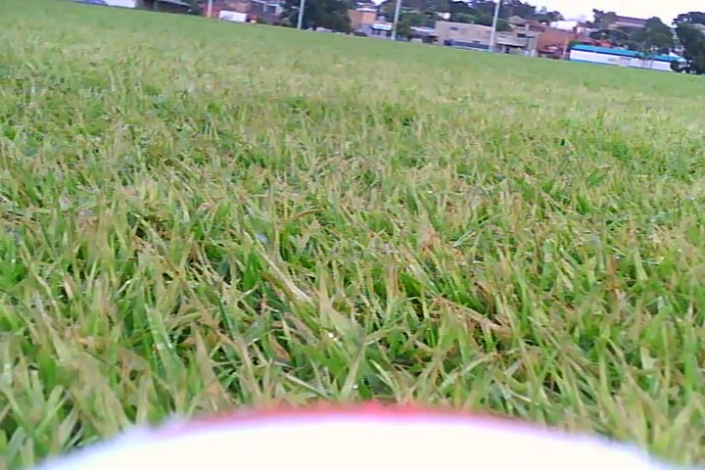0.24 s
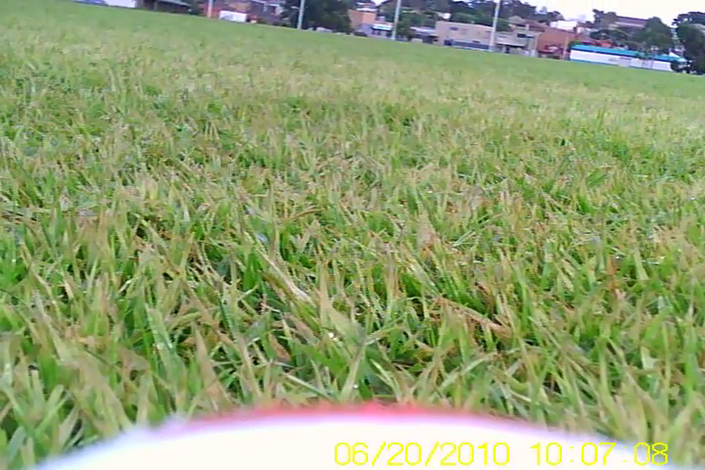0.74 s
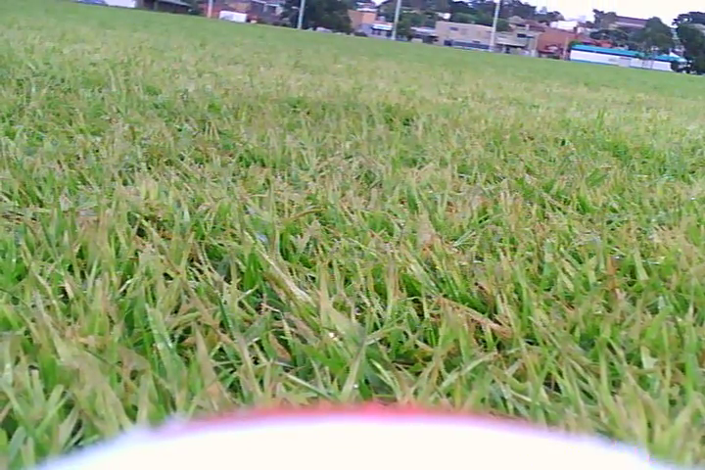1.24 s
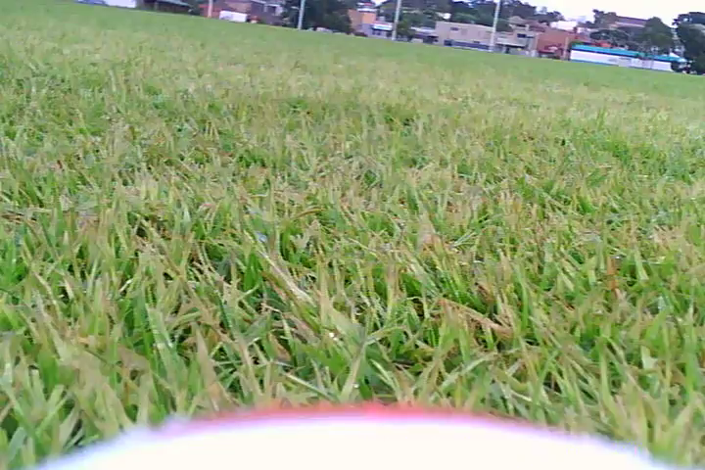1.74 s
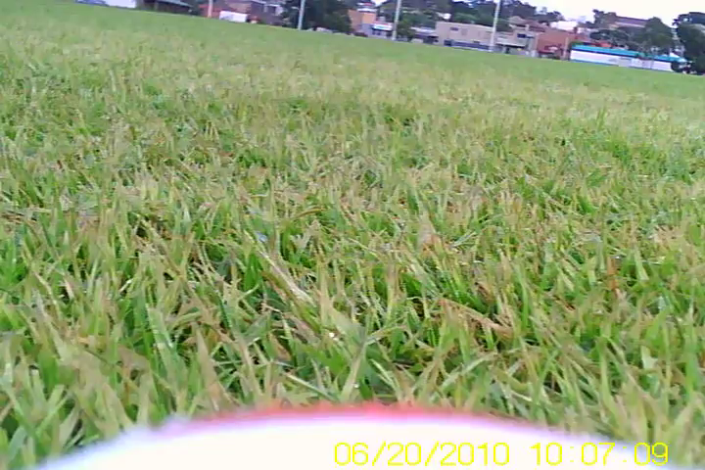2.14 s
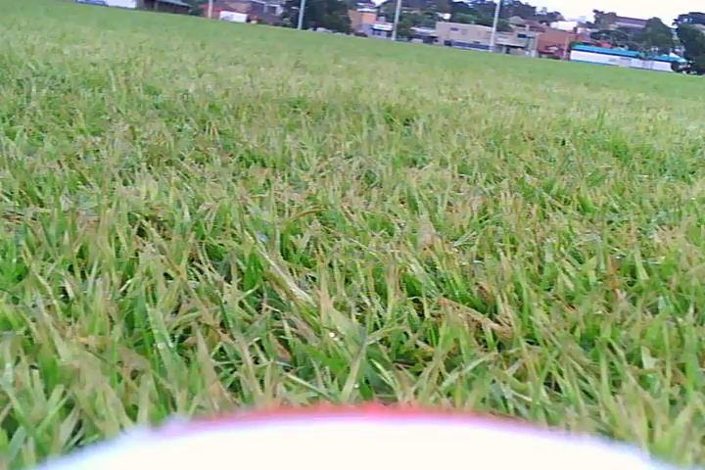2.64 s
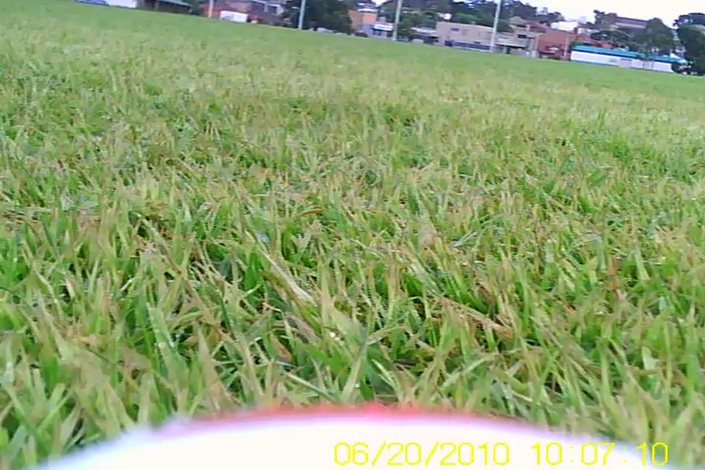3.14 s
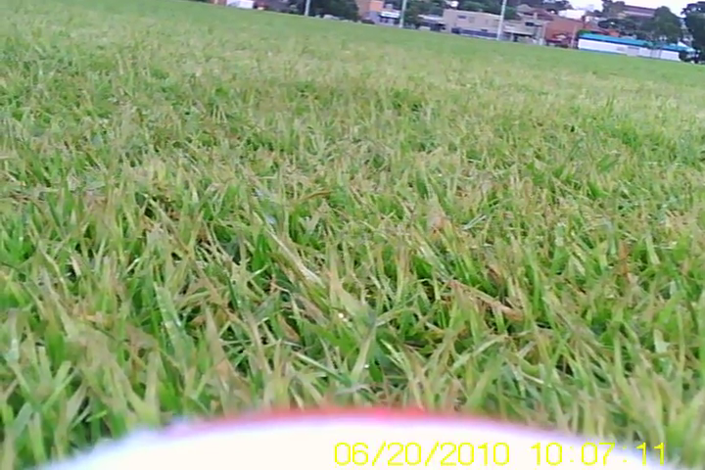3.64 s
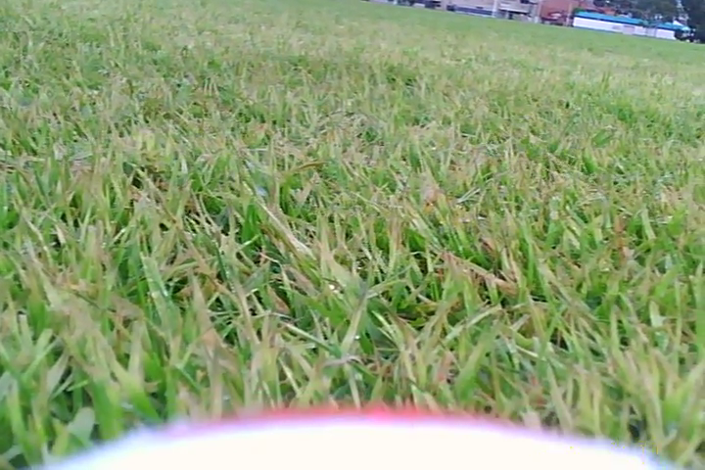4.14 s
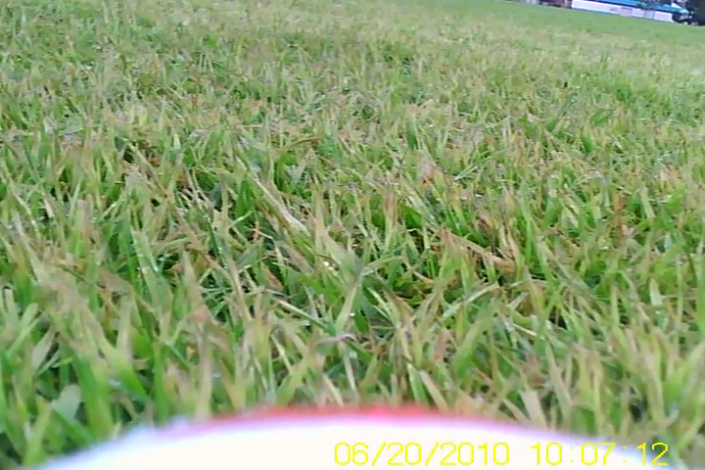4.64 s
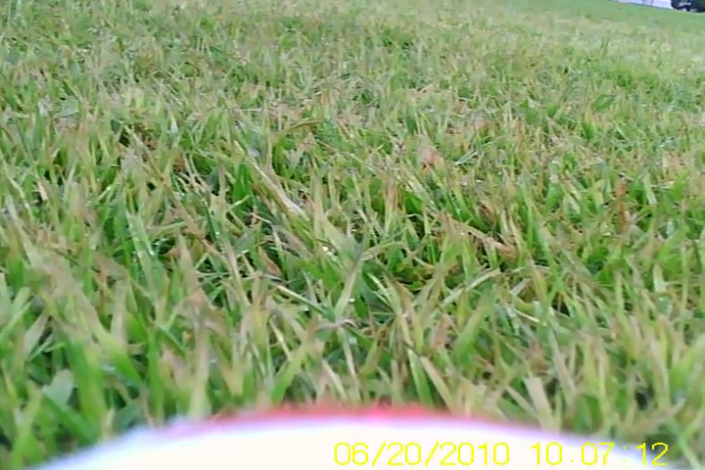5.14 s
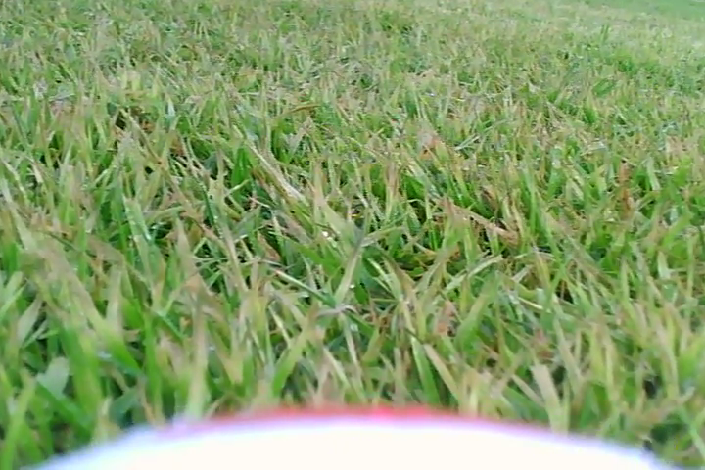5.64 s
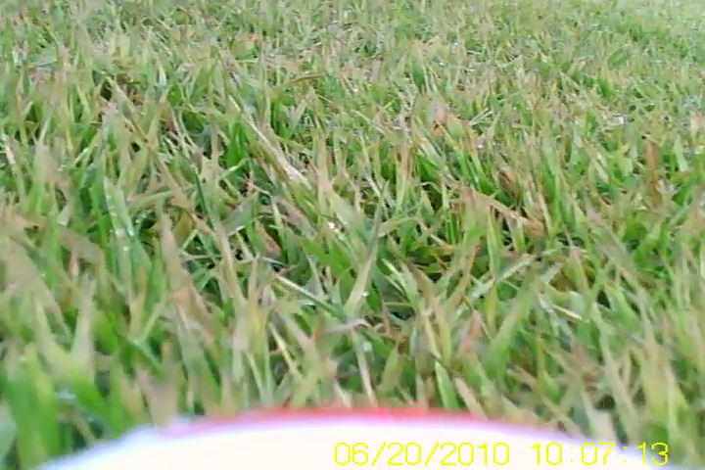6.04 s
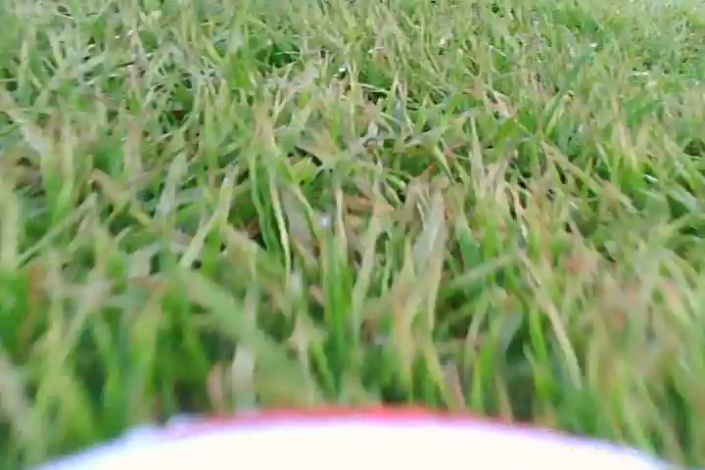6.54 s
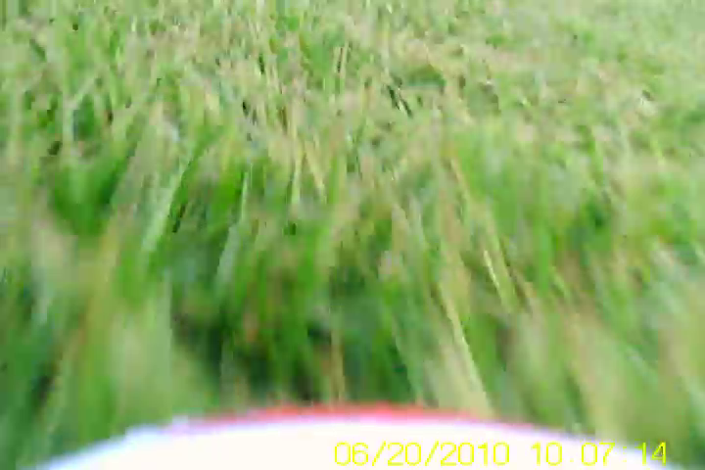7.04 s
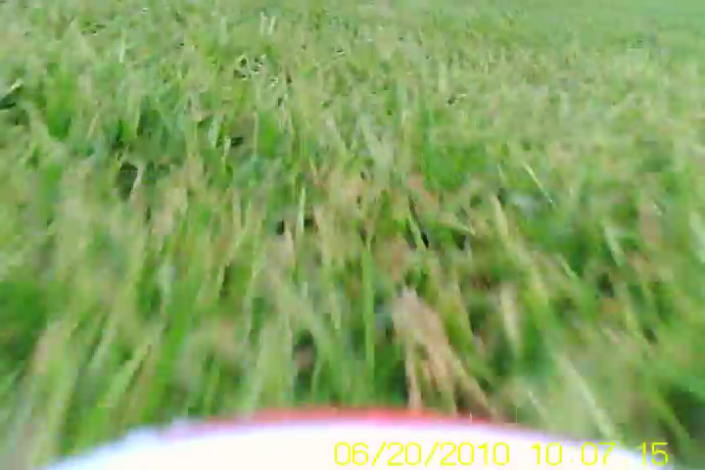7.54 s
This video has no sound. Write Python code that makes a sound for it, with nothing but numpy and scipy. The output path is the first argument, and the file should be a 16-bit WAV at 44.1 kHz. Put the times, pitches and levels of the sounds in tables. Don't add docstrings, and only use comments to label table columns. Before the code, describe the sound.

On an open windy field, tiny gear motors twitch and rasp before a little electric propeller jerks to life, climbs in pitch and roars steadily.

```python
import sys
import numpy as np
from scipy import signal
from scipy.fft import rfft, irfft
from scipy.io import wavfile
from scipy.ndimage import uniform_filter1d

SR = 44100
rng = np.random.default_rng(int(sys.argv[2]) if len(sys.argv) > 2 else 0)


def field_ratio(decibels):
    return 10 ** (np.asarray(decibels, dtype=float) / 20)


def pcm_store(signal):
    levels = np.round(np.clip(np.atleast_2d(signal), -1, 1) * 32767)
    wavfile.write(sys.argv[1], SR, levels.astype(np.int16).T)


N = 343098

# f/Hz, density/dB
WIND_SPECTRUM = [(8.8, -27), (15, -5), (48, -3), (102, -5), (114, -13.5), (127, -9), (164, -15), (229, -18),
                 (285, -20.5), (484, -25), (2950, -38.5), (9730, -43), (11500, -55), (15000, -67),
                 (22000, -120)]
# t/s, level/dB
GUSTS = [(1.6, 2), (3.0, 1), (5.1, 5.5), (7.3, 4.5)]
# t/s, length/s, gear drive level/dB, start re drive/dB, load rumble re drive/dB
STROKES = [(0.085, .12, -41.5, -1.5, -20), (0.237, 0.11, -40.5, -2, -1), (0.39, 0.15, -38.5, -7.5, -1),
           (0.544, 0.14, -39.5, -11, 3), (0.791, 0.1, -41, -0.5, -14), (0.95, 0.12, -43, -13, 1.5),
           (1.161, 0.096, -41, -7, -9), (1.358, 0.086, -41.5, -4.5, 2), (1.767, 0.072, -41, -9, -30),
           (1.911, 0.093, -37.5, 0, -25), (2.748, 0.07, -52.5, -7, -13)]
# t/s, pulses/1, level/dB
HUNTING = [(0.018, 3, -25), (.136, 1, -26), (0.22, 1, -23), (.257, 1, -28), (0.35, 1, -29), (.578, 1, -30),
           (.623, 1, -31), (.685, 2, -27), (0.746, 2, -30), (.925, 4, -26), (1.078, 1, -26),
           (1.119, 1, -30), (1.298, 2, -23.5), (1.472, 1, -29), (1.583, 1, -28), (1.607, 3, -22),
           (1.675, 3, -20), (1.741, 2, -15), (1.788, 3, -18.5), (1.851, 3, -21.5), (2.007, 1, -30),
           (2.029, 1, -19), (2.111, 1, -26.5), (2.153, 1, -27.5), (2.752, 3, -32), (2.905, 2, -27)]
# f/Hz, density/dB
CASE_A = [(650, -11), (1150, -4), (1450, -2), (1650, 11), (1950, -12), (2280, -7.5), (2750, -11.5),
          (3100, -23), (3900, -9), (5300, -14.5), (6050, -7), (7200, -16.5), (9300, -15), (11500, -69)]
# f/Hz, density/dB
CASE_B = [(410, -57), (700, -24), (864, -24), (1300, -7), (1500, 5.5), (1960, -10.5), (2690, -5),
          (3060, -23.5), (4950, -16), (6550, -20.5), (9760, -33.5), (11500, -59), (15000, -85),
          (22000, -120)]
# f/Hz, width/Hz, level/dB
LINKAGE = [(411, 48, 4.5), (704, 61, 0), (1050, 86, 4)]
# t/s, peak level/dB
KICKS = [(2.866, -13.5), (2.929, -18.5), (2.94, -15.5), (2.95, -16), (2.957, -17), (2.97, -16.5),
         (2.983, -18.5), (3.013, -18), (3.035, -10.5)]
# f/Hz, width/Hz, level/dB
MOUNT = [(620, 280, -6), (924, 98, 8.5), (1510, 91, 1), (2010, 330, -10.5), (2720, 150, -4.5),
         (3550, 600, -21), (6100, 620, -19.5), (8150, 850, -16.5)]
# t/s, f/Hz, level/dB
WHISTLE = [(2.868, 8100, -55), (2.925, 8080, -62), (2.935, 8100, -44), (2.97, 8170, -34),
           (3.035, 8240, -33), (3.045, 8100, -33), (3.8, 8085, -31), (4.1, 8060, -30), (5.59, 8055, -32),
           (5.63, 8095, -41), (5.85, 8100, -48), (6.55, 8095, -50), (6.9, 8045, -39), (7.35, 8045, -39),
           (7.45, 8085, -46), (7.78, 8085, -46)]
# f/Hz, density/dB
BUFFET = [(150, -89), (300, -12.5), (600, -6.5), (1000, -4.5), (1600, 5), (2300, 4), (2900, -14),
          (3400, -20), (5000, -25.5)]
# f/Hz, density/dB
HISS = [(1650, -15), (2800, 3.5), (3170, -0.5), (6000, -1), (6580, -4.5), (7680, -1), (7820, -6.5),
        (8320, -11.5), (8530, -12.5), (10500, -10), (12200, -33), (15800, -66), (22000, -120)]
# t/s, speed/(turns per s)
THROTTLE = [(3.403, 92.3), (3.547, 97.3), (3.66, 107.7), (3.941, 108.6), (4.218, 120.8), (4.545, 122.0),
            (4.704, 128.4), (5.217, 128.9), (5.391, 134.6), (5.621, 139.8), (5.632, 144.4), (5.928, 147.1),
            (6.468, 147.4), (6.583, 146.0), (6.797, 137.5), (7.368, 136.2), (7.41, 143.7), (7.78, 143.7)]
# t/s, load level/dB, inflow skew level/dB
LOAD = [(3.12, -20.5, 1), (3.28, -9.5, 3.5), (3.36, -4.5, -1), (3.55, -5, 5), (3.8, -1.5, -1),
        (4.15, -1, 0), (4.2, -0.5, 1.5), (4.62, -0.5, 1), (4.68, 3, -3.5), (5.4, 3, -3.5), (5.6, 5, -1),
        (6.25, 3.5, 1.5), (6.85, 0, -3), (7.3, -1.1, -3.5), (7.5, 1.5, -5.5), (7.78, 1.5, -5.5)]
# t/s, level/dB
JERKS = [(3.016, -27), (3.039, -16.5), (3.055, -16), (3.068, -11), (3.08, -15), (3.101, -23), (3.123, -24)]
# shaft multiple/1, level/dB
COGGING = [(22, -10), (24, -1), (26, -5.5), (44, -9), (48, -11), (52, -13), (66, -13), (72, -15.5),
           (78, -26.5)]
# shaft multiple/1, rms level/dB
MAGNETS = [(22, -40), (24, -33.5), (26, -25), (28, -24.5), (30, -38.5)]
# f/Hz, gain/dB
MOTOR_SHELL = [(1200, 9.5), (1500, 0.5), (1800, 2.5), (2100, 7), (2300, 0), (2420, -11), (2750, 3.5),
               (2950, -20), (3300, -4), (4500, -49)]
# t/s, length/s, imbalance level/dB
SHUDDERS = [(3.95, .35, -56), (5.411, .23, -34), (6.74, .4, -43), (7.14, .3, -46), (7.44, .4, -44.5)]
# shaft multiple/1, rms level/dB
BLADES = [(2, -30.5), (4, -22.5), (6, -32.5), (8, -20.5), (10, -36.5), (12, -30.5), (14, -39), (16, -34),
          (18, -40.5), (20, -36.5), (24, -37), (28, -38), (32, -34), (36, -58), (40, -41), (44, -40.5)]
# f/Hz, gain/dB
AIRFRAME = [(200, 4), (300, -7), (420, -0.5), (480, -5.5), (530, 0), (900, -2.5), (1250, -8.5), (1500, 7.5),
            (1750, 12.5), (1950, 13), (2150, 6), (2400, -6), (3300, -9), (4000, -13)]
# t/s, length/s, gain/dB
FLUTTERS = [(4.655, 0.69, 8), (7.456, .4, 12)]

WIND_DB, GUST_S = -47, 0.56
SECOND_SERVO_S = 1.55
SERVO_FRAME_S, TWITCH_SPREAD_DB = .0222, .8
STROKE_EDGE_S, STROKE_PEAK_SHARE, STROKE_END_DB, LOAD_ENDS_DB = 0.011, 0.56, -8, -16
THROB_DB, THROB_S = 1.5, 0.0037
CATCH_S, SPIN_UP_S, ROTOR_LAG_S = 2.966, .174, .036
SWAY_S, SWAY_LENGTH_S, SWAY_PERIOD_S, SWAY_SHARE = 6.135, .13, .18, .009
ROLL_S = 5.64
ROLL_RASP_DB_PER_S, ROLL_BUFFET_DB_PER_S, ROLL_HISS_DB_PER_S = 2, 2.5, -2.5
CHOPPING_DB, UNSTEADY_HZ, BLUR_SHARE = -31, 10, .6
BUFFET_DB, BUFFET_FOLLOWS_SHARE = -29, 0.38
SURGE_DB, SURGE_S = 17.5, 0.23
HISS_DB, HISS_DB_PER_DECADE, HISS_FREED_DB = -32., 45, -4.5
GRIP_S, JERK_RISE_DB_PER_S, JERK_FALL_DB_PER_S = 3.008, 1300., 899
MAGNET_PULL_DB, MAGNET_EASES_S, MAGNET_EASED_DB, MAGNET_FADE_DB_PER_S = 3., 3.45, -1.5, 7.
BALANCED_DB, SHUDDER_EDGE_DB_PER_S = -62, 900.
RING_HZ, RING_WIDTH_HZ, RING_DB = 4050, 300, 4.5
SKEW_BODY_SHARE, FLICKER_DB = 0.44, 3
OVERLOAD = .72


def clock():
    return np.arange(N) / SR


def rms_one(x):
    return x / np.sqrt(np.mean(x ** 2) + 1e-20)


def in_time(rows):
    s, *columns = np.transpose(rows)
    return [np.interp(clock(), s, c) for c in columns]


def sounding(rows, fade=0.0013):
    t = clock()
    return np.clip(np.minimum(t - rows[0][0], rows[-1][0] + fade - t) / fade, 0, 1)


def at_hz(points, hz):
    points = np.array(points)
    return np.interp(np.log(hz), np.log(points[:, 0]), points[:, 1])


def drift(rate_hz, first=0):
    r = np.exp(-80 * np.pi * rate_hz / SR)
    slow = signal.lfilter([1], [1, -2 * r, r * r], rng.standard_normal(N // 40 + 2002))[2000:]
    return np.interp(np.arange(first, N) / 40, np.arange(len(slow)), rms_one(slow))


def resonate(x, peaks):
    out = 0
    for k, (hz, width_hz, level_db) in enumerate(peaks):
        r = np.exp(-np.pi * max(width_hz, 10) / SR)
        b = (1 - r * r) / 2 * np.array([1, 0, -1])
        a = [1, -2 * r * np.cos(2 * np.pi * hz / SR), r * r]
        out = out + (-1) ** k * field_ratio(level_db) * signal.lfilter(b, a, x)
    return out


def through(x, spectrum):
    size = 4096
    hz = np.maximum(np.fft.rfftfreq(size, 1 / SR), 1)
    cepstrum = irfft(np.log(field_ratio(at_hz(spectrum, hz))))
    cepstrum[1:size // 2] *= 2
    cepstrum[size // 2 + 1:] = 0
    response = irfft(np.exp(rfft(cepstrum)))[:size // 2]
    return signal.oaconvolve(x, response / np.linalg.norm(response))[:len(x)]


def coloured_noise(spectrum, patchy_db, flicker_hz):
    hz = np.maximum(np.fft.rfftfreq(N, 1 / SR), 1)
    low_hz, high_hz = spectrum[0][0], spectrum[-1][0]
    inside = (hz >= low_hz) & (hz <= high_hz)
    shaped = rfft(rng.standard_normal(N)) * field_ratio(at_hz(spectrum, hz)) * inside
    together, out = drift(flicker_hz), 0
    for octave in np.arange(np.floor(np.log2(low_hz)), np.log2(high_hz) + 1):
        share = np.cos(np.pi / 2 * np.clip(np.log2(hz) - octave, -1, 1)) ** 2
        out = out + irfft(shaped * share, N) * field_ratio(patchy_db * (together + drift(flicker_hz)))
    return rms_one(out)


def bursts(events, t60_s):
    marks = np.full(N, 1e-18)
    marks[[round(s * SR) for s, db in events]] = field_ratio(np.array(events)[:, 1])
    return signal.lfilter([1], [1, -field_ratio(-60 / (t60_s * SR))], marks)


def chatter(per_s, spread_db):
    sizes = field_ratio(spread_db * np.minimum(rng.exponential(1, N), 4)) * rng.choice([-1, 1], N)
    return rms_one(sizes * (rng.random(N) < per_s / SR))


def field():
    air = field_ratio(WIND_DB) * coloured_noise(WIND_SPECTRUM, patchy_db=.5, flicker_hz=32.0)
    rumble = signal.sosfilt(signal.butter(2, 110, fs=SR, output="sos"), air)
    gust_db = sum(db * np.exp(-((clock() - s) / GUST_S) ** 2) for s, db in GUSTS)
    return air + (field_ratio(gust_db) - 1) * rumble


def hunting():
    pulses = []
    for s, count, db in HUNTING:
        for k in range(round(count)):
            pulses.append((s + SERVO_FRAME_S * k, db + TWITCH_SPREAD_DB * rng.standard_normal()))
    return uniform_filter1d(bursts(pulses, t60_s=0.061), size=220, origin=60) * field_ratio(-17.5)


def stroke(length_s, drive_db, start_db, load_db):
    since = np.arange(round(length_s * SR)) / SR
    place = since / length_s
    rise = np.clip(1 - place / STROKE_PEAK_SHARE, 0, 1)
    fall = np.clip((place - STROKE_PEAK_SHARE) / (1 - STROKE_PEAK_SHARE), 0, 1)
    gate = np.clip(np.minimum(since, length_s - since) / STROKE_EDGE_S, 0, 1)
    throb_db = THROB_DB * np.cos(2 * np.pi * (since - THROB_S) / SERVO_FRAME_S)
    push = gate * field_ratio(drive_db + start_db * rise + STROKE_END_DB * fall ** 2 + throb_db)
    return push * field_ratio(4.5), push * field_ratio(load_db + LOAD_ENDS_DB * (rise + fall) ** 2)


def servos():
    drive = hunting()
    load = drive * field_ratio(-18.0)
    for s, *settings in STROKES:
        push, strain = stroke(*settings)
        span = slice(round(s * SR), round(s * SR) + len(push))
        drive[span] += push
        load[span] += strain
    teeth = chatter(4000., spread_db=2.5) * field_ratio(0.81 * drift(60.))
    first = clock() < SECOND_SERVO_S
    cases = through(teeth * drive * first, CASE_A) + through(teeth * drive * ~first, CASE_B)
    return cases + resonate(teeth * load + 1e-18, LINKAGE) / np.std(resonate(teeth, LINKAGE))


def stutter():
    knocks = bursts(KICKS, t60_s=.022) * chatter(9000., spread_db=1.5)
    dull = signal.butter(4, 8500, fs=SR, output="sos")
    return field_ratio(6.5) * signal.sosfilt(dull, resonate(knocks, MOUNT))


def whistle(start, angle):
    hz, level_db = in_time(WHISTLE)
    unsteady_hz = UNSTEADY_HZ * field_ratio(BLUR_SHARE * np.clip(CHOPPING_DB - level_db, 0, 18))
    phase = 2 * np.pi * np.cumsum(hz + unsteady_hz * drift(50.)) / SR
    tone = sounding(WHISTLE) * field_ratio(level_db + 0.58 * drift(43.0)) * np.sin(phase)
    return np.sqrt(2) * tone[start:] * (1 + 0.12 * np.cos(2 * angle))


def wash(start, turns, angle):
    t = clock()[start:]
    rolled_s = np.maximum(t - ROLL_S, 0)
    rolling = rolled_s > 0
    caught = np.clip((t - CATCH_S) / 0.11 + 0.44, 0, 1)
    buffet_db = BUFFET_DB + BUFFET_FOLLOWS_SHARE * in_time(LOAD)[0][start:]
    buffet_db = buffet_db + SURGE_DB * np.exp((CATCH_S - t) / SURGE_S)
    buffet_db = buffet_db + rolling * (ROLL_BUFFET_DB_PER_S * rolled_s - 3.0)
    hiss_db = HISS_DB + HISS_DB_PER_DECADE * np.log10(np.maximum(turns, 18.) / 100)
    hiss_db = hiss_db + HISS_FREED_DB * rolling + ROLL_HISS_DB_PER_S * rolled_s
    buffet = field_ratio(buffet_db) * caught ** 2 * coloured_noise(BUFFET, patchy_db=.9, flicker_hz=25.)[start:]
    hiss = field_ratio(hiss_db) * coloured_noise(HISS, patchy_db=0.54, flicker_hz=29.0)[start:]
    high = signal.butter(6, 8600, "high", fs=SR, output="sos")
    top = signal.sosfilt(high, signal.sosfilt(high, hiss)[::-1])[::-1]
    hiss = hiss - top * field_ratio(-.1 * angle / np.pi)
    throb = 1 + 0.034 * np.cos(2 * angle) + 0.27 * np.cos(4 * angle)
    return (buffet + hiss) * throb * (caught > 0)


def shaft_speed():
    asked = in_time(THROTTLE)[0]
    r = np.exp(-1 / (ROTOR_LAG_S * SR))
    trailing = signal.lfilter([1 - r], [1, -r], asked - asked[0]) + asked[0]
    since = clock() - SWAY_S
    sway = np.sin(2 * np.pi * since / SWAY_PERIOD_S) * np.exp(-(since / SWAY_LENGTH_S) ** 2)
    gathered = 1 - np.exp((CATCH_S - clock()) / SPIN_UP_S)
    return np.maximum(trailing * (1 + SWAY_SHARE * sway) * gathered, 5)


def cogging(t, turns):
    swells = [db - np.maximum(JERK_RISE_DB_PER_S * (s - t), JERK_FALL_DB_PER_S * (t - s)) for s, db in JERKS]
    catch_db = np.max(swells, axis=0) + np.minimum(2500 * (t - GRIP_S), 0)
    return [(k, db + catch_db + (k > 30) * at_hz(MOTOR_SHELL, k * turns), .3) for k, db in COGGING]


def magnet_pull(t, turns, slow_db):
    eased = np.clip((t - MAGNET_EASES_S) / 0.051 + .5, 0, 1)
    eased_db = MAGNET_EASED_DB - MAGNET_FADE_DB_PER_S * (t - MAGNET_EASES_S)
    pull_db = MAGNET_PULL_DB * (1 - eased) + eased * eased_db + 300 * slow_db
    return [(k, db + pull_db + at_hz(MOTOR_SHELL, k * turns), .12) for k, db in MAGNETS]


def imbalance(t, turns, rolled_s):
    levels = [BALANCED_DB + 0 * t]
    for s, length_s, db in SHUDDERS:
        levels.append(db + SHUDDER_EDGE_DB_PER_S * np.minimum(np.minimum(t - s, s + length_s - t), 0))
    wobble_db = np.max(levels, axis=0)
    lines = []
    for k in range(1, 19, 2):
        cut_db = 9. * (k == 1) + (7. - 4. * rolled_s) * (k == 3)
        lines.append((k, wobble_db - cut_db + 0.066 * at_hz(AIRFRAME, k * turns), .4))
    return lines


def blade_tones(start, turns, slow_db, rolled_s):
    blade_db, skew_db = [c[start:] for c in in_time(LOAD)]
    lines = []
    for k, db in BLADES:
        skewed = k % 4 == 2 and k > 4
        body_share = SKEW_BODY_SHARE if skewed else 1
        level_db = db + blade_db + skewed * skew_db + 60 * slow_db + body_share * at_hz(AIRFRAME, k * turns)
        if k == 10:
            for s, length_s, gain_db in FLUTTERS:
                level_db = level_db + gain_db * sounding([[s], [s + length_s]], fade=0.044)[start:]
        if k > 17:
            level_db = level_db + FLICKER_DB * drift(9.5, start)
        if k > 22:
            level_db = level_db + 90 * np.log10(np.minimum(turns / 110, 1))
            level_db = level_db + ROLL_RASP_DB_PER_S * rolled_s * (1 if k < 30 else -1)
            level_db = level_db + RING_DB * np.exp(-((k * turns - RING_HZ) / RING_WIDTH_HZ) ** 2)
        lines.append((k, level_db, 2.4 / k if skewed else .07))
    return lines


def motor(start, turns, angle):
    t = clock()[start:]
    rolled_s = np.maximum(t - ROLL_S, 0)
    slow_db = np.log10(np.minimum(turns / 54, 1))
    lines = cogging(t, turns) + magnet_pull(t, turns, slow_db) + imbalance(t, turns, rolled_s)
    lines += blade_tones(start, turns, slow_db, rolled_s)
    out = np.zeros_like(angle)
    for k, level_db, rough in lines:
        heard = np.flatnonzero(level_db > -75).max(initial=0) + 1
        swell = 1 + 0.16 * drift(4.2, start) + rough * drift(32.0, start)
        phase = rng.normal(0, .35 + .0025 * k * k) + rough * drift(70., start)
        tone = field_ratio(level_db[:heard]) * swell[:heard] * np.cos(k * angle[:heard] + phase[:heard])
        out[:heard] += tone
    return np.sqrt(2) * out


def scene():
    start = round(WHISTLE[0][0] * SR)
    turns = shaft_speed()[start:]
    jitter = .0028 * (turns / 147) ** 4 * drift(13., start)
    angle = 2 * np.pi * np.cumsum(turns * (1 + jitter)) / SR
    out = field() + servos() + stutter()
    out[start:] += whistle(start, angle) + wash(start, turns, angle) + motor(start, turns, angle)
    return out[None]


def roll_off(x):
    return signal.sosfilt(signal.butter(12, 12330, fs=SR, output="sos"), x)


def record(dry):
    mix = np.clip(dry, -OVERLOAD, OVERLOAD)
    return roll_off(mix)


dry = scene()
out = record(dry)
pcm_store(out)
```